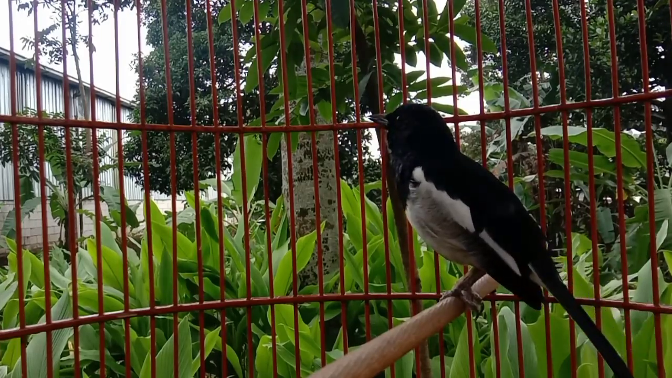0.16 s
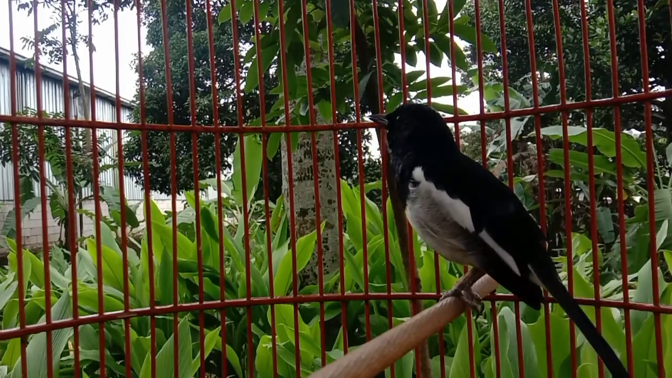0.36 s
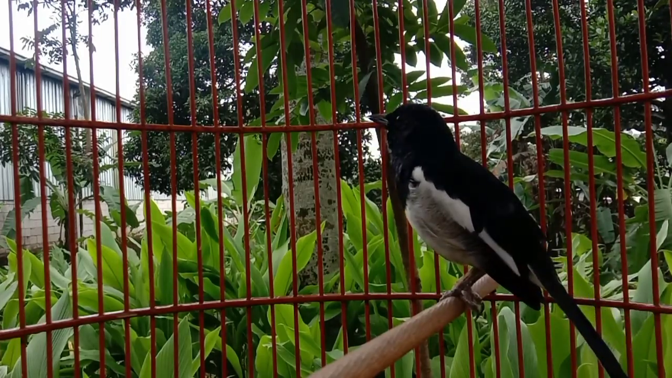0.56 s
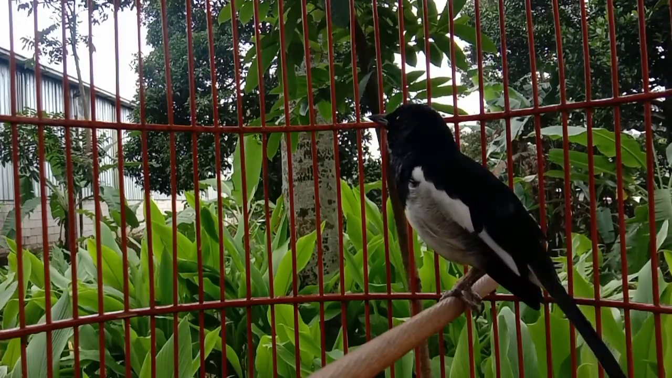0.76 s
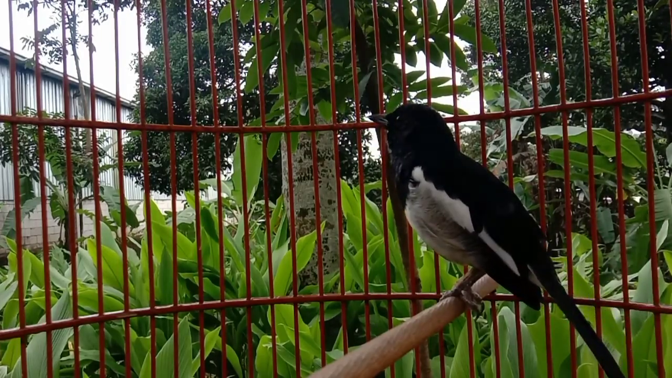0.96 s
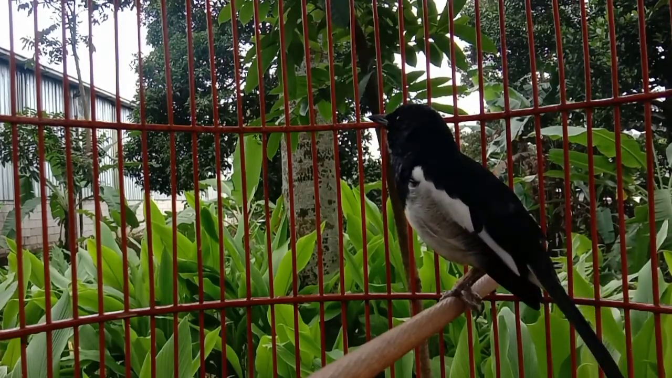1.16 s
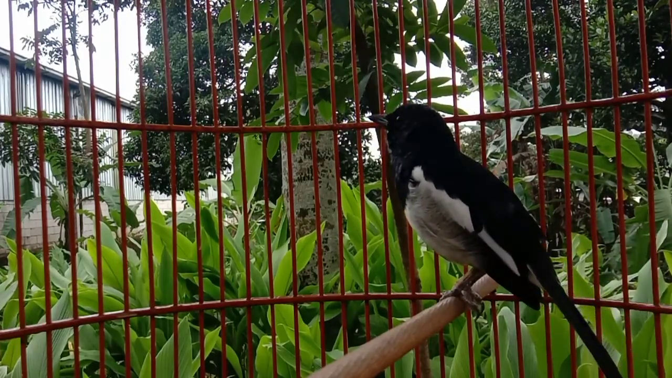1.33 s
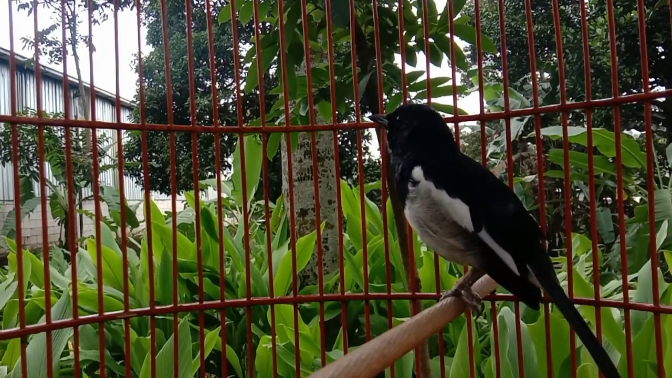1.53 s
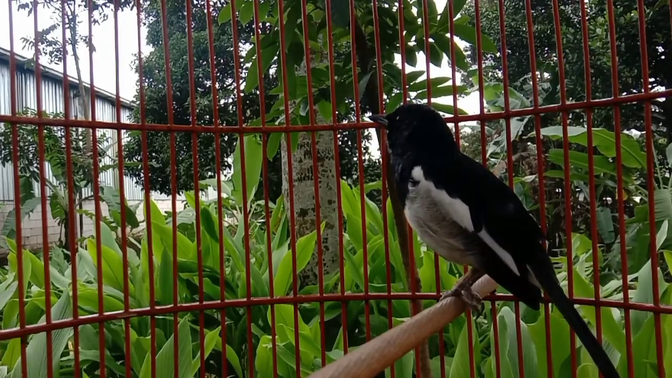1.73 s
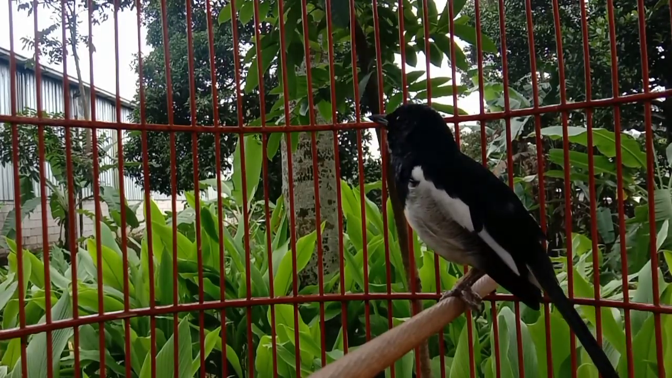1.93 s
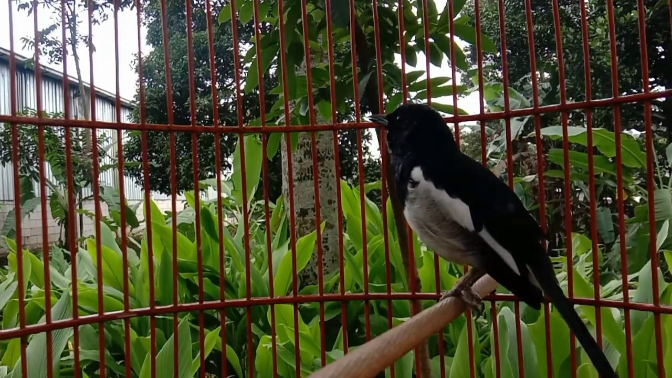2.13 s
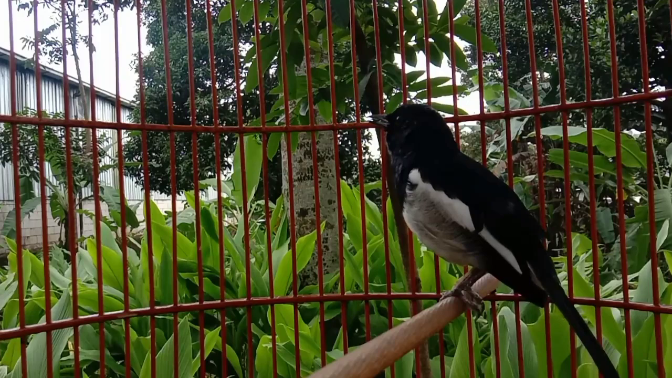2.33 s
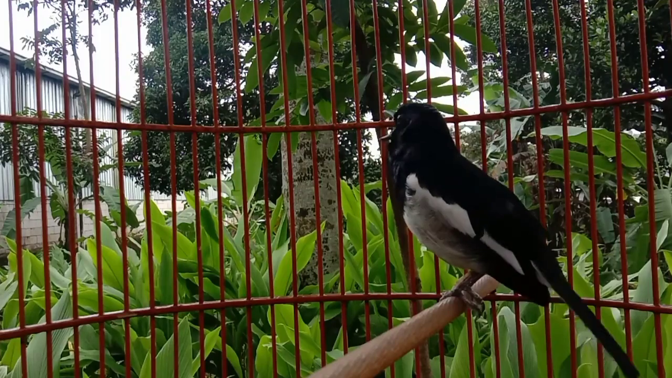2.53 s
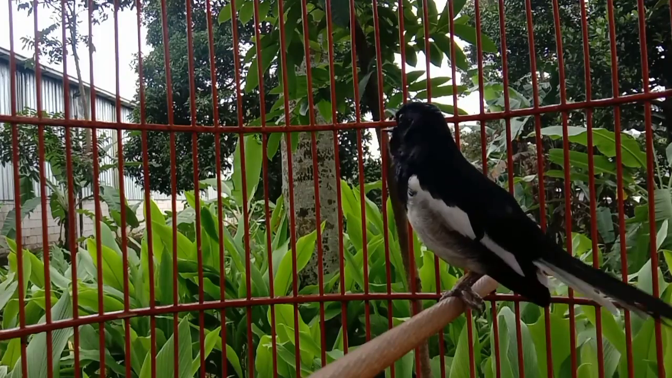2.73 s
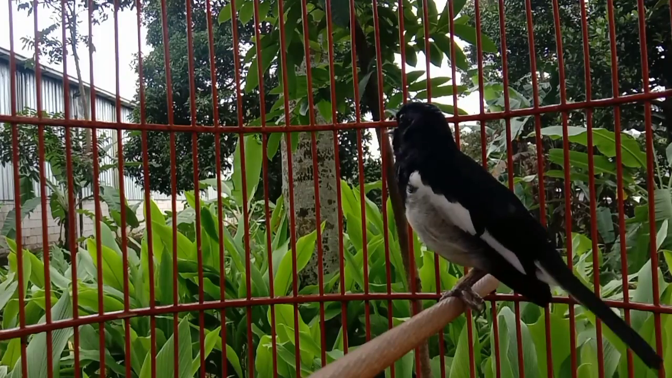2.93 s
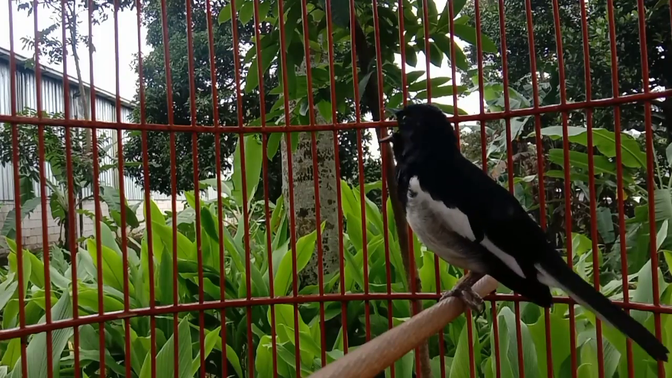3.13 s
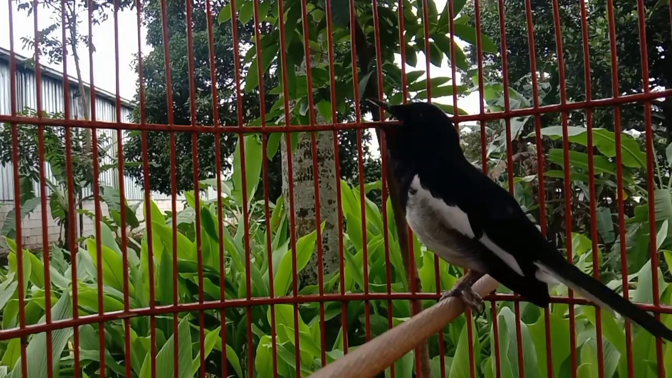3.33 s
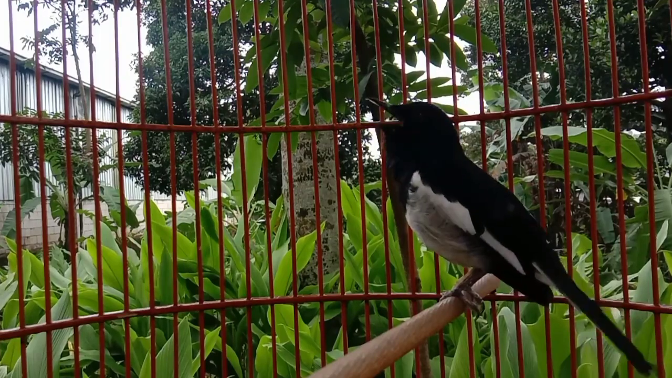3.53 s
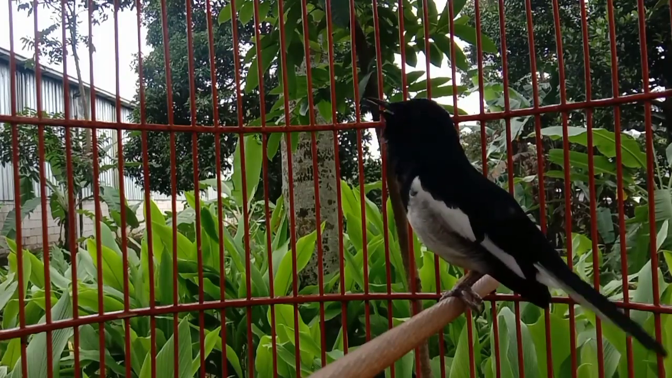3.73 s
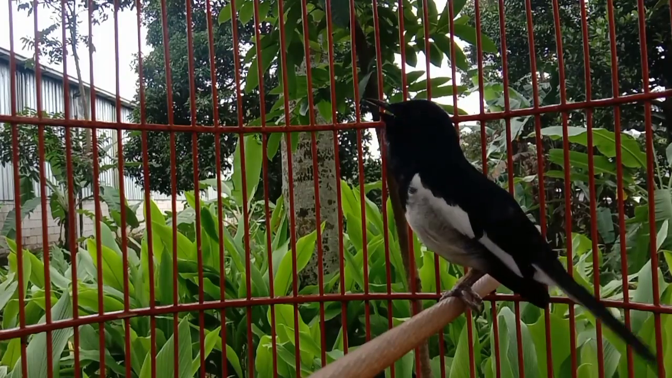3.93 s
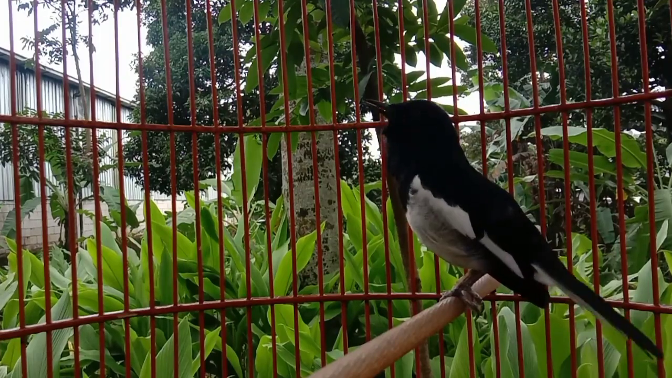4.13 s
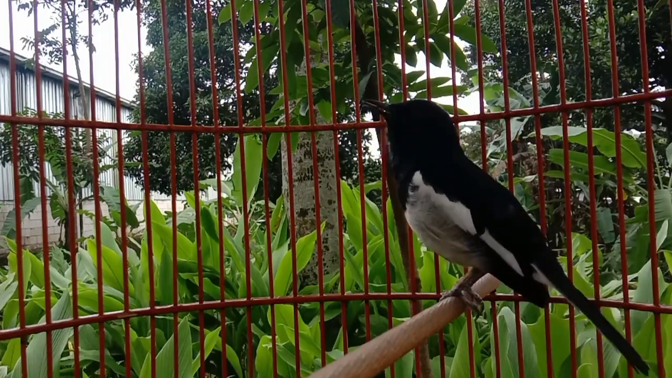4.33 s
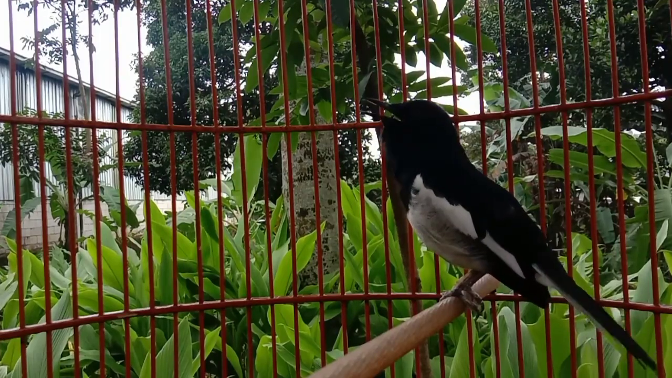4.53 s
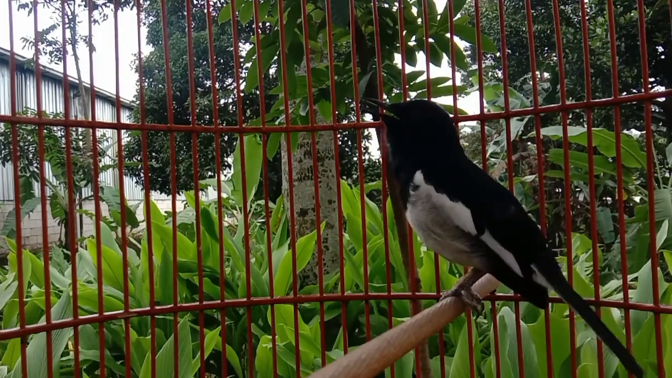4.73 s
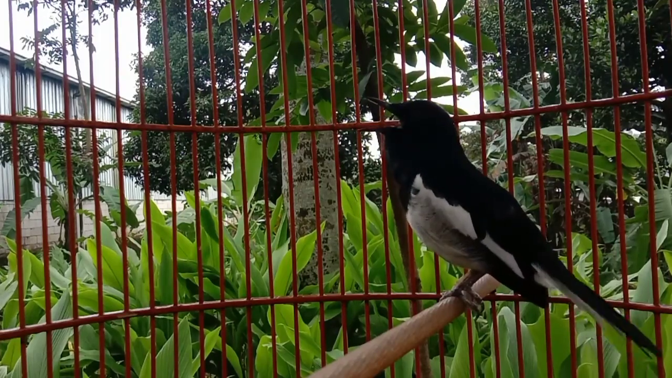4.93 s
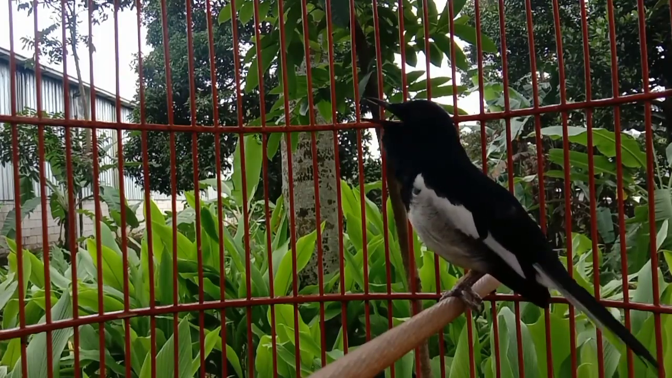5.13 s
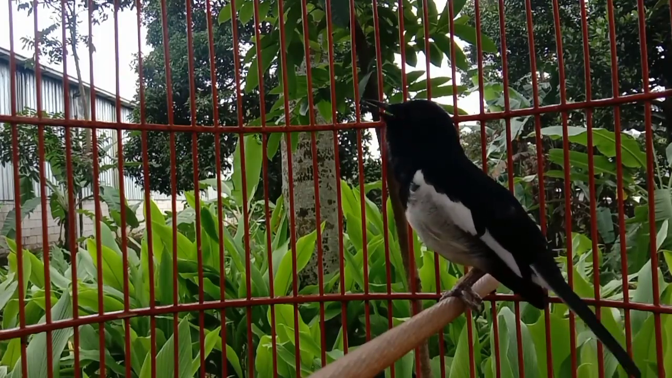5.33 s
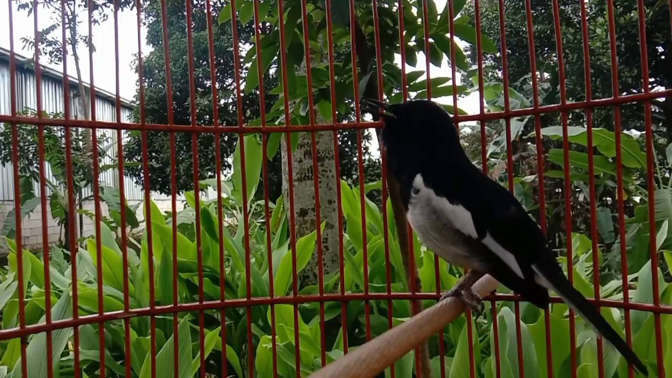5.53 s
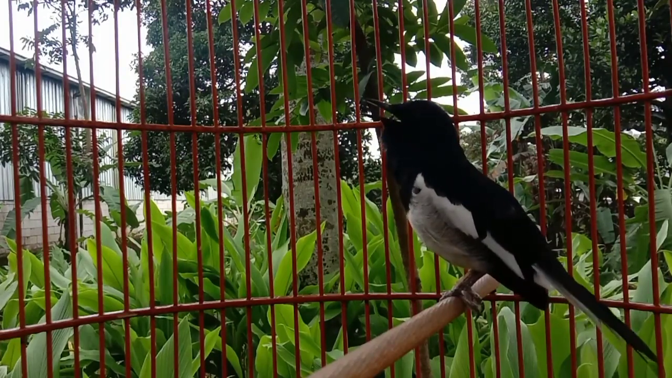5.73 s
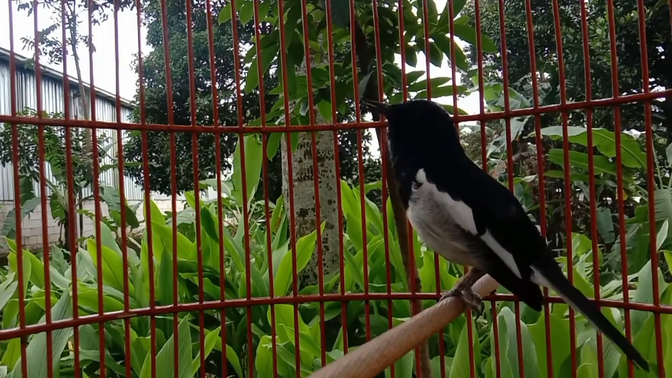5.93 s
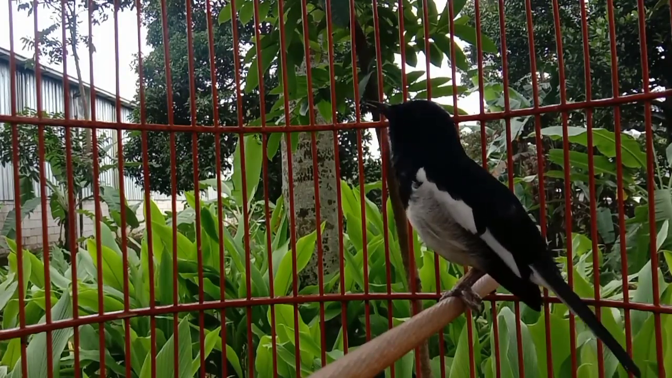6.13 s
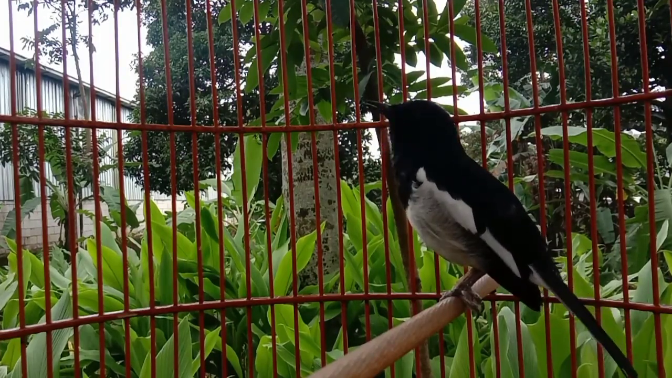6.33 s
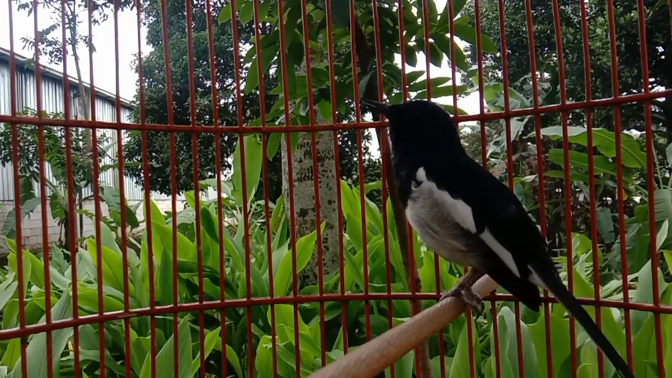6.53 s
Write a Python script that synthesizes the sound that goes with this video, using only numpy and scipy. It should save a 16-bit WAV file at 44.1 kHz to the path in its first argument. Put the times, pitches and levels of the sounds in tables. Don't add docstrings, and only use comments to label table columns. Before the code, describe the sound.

A caged songbird whistles nine loud, clear, varied notes close by, after a quiet garden opening with a far rooster and rustles.

```python
import sys
import numpy as np
from scipy import signal
from scipy.fft import rfft, irfft, next_fast_len
from scipy.io import wavfile
from scipy.ndimage import uniform_filter1d, map_coordinates

SR = 44100
rng = np.random.default_rng(int(sys.argv[2]) if len(sys.argv) > 2 else 0)


def generate_wav(signal):
    frames = np.transpose(np.atleast_2d(signal))
    scaled = np.clip(frames, -1, 1) * 32767
    pcm = np.round(scaled).astype(np.int16)
    wavfile.write(sys.argv[1], SR, pcm)


def volts(x):
    e = np.asarray(x, float) / 20
    return 10 ** e


N = 289296
TIME = np.arange(N) / SR

# time in seconds, level in dB.
TRAFFIC = [(0, -56.5), (.95, -53.5), (1.4, -55.5), (1.9, -55), (2.95, -55), (3.45, -53.5), (4, -59),
           (4.35, -54), (5.4, -58.5), (5.95, -54.5), (6.25, -53), (6.56, -57)]
# frequency in Hz, density in dB per Hz.
RUMBLE = [(15, -45), (25, -14.5), (43, -26), (73, 6), (113, 2.5), (257, -11), (318, -17.5), (441, -30.5),
          (500, -31.5), (650, -46.5), (1100, -120)]
# frequency in Hz, density in dB per Hz.
AIR = [(180, -35.5), (300, 2.5), (1360, -9.5), (1500, -7.5), (1660, -13), (3990, -18.5), (4410, -14.5),
       (7300, -25), (8200, -31), (9940, 2.5), (11500, -35), (13000, -33), (14500, -27), (15800, -28)]
# centre in Hz, width in Hz, level in dB, unsteadiness in dB.
DRONES = [
    (1256, 30, -75, 4.5),
    (4300, 110, -76.5, 3.5),
    (5700, 200, -76.5, 4.5),
    (9910, 440, -65.5, 2),
]
# peak in seconds, level in dB, rise in seconds, t60 in
# seconds.
PUFFS = [
    (0.985, -46, 0.06, 0.5),
    (1.814, -56.5, 0.0044, 0.46),
    (2.461, -54, 0.11, 0.27),
    (6.09, -61, 0.034, 0.32),
    (5.41, -63, .06, .3),
    (3.39, -52, .02, .55),
]
# frequency in Hz, density in dB per Hz.
PUFF_COLOURS = [
    [(120, -39), (372, -0.5), (908, -7.5), (1250, 3.5), (1590, -8.5), (2810, -9), (7600, -18), (8500, -32),
     (15000, -36)],
    [(590, -48), (1000, -18), (1380, -8.5), (2500, -16.5), (7500, -24), (9000, -36), (15000, -42)],
    [(180, -41), (300, -13.5), (700, -2), (1020, -16), (1270, 2), (1800, -31), (2340, -57), (3960, -120)],
    [(1760, -30), (3000, 0), (4810, -9.5), (6930, 5), (8000, -17.5), (10400, -45.5), (17600, -120)],
    [(3000, -30), (4600, -6), (5500, 0), (7400, -6), (8200, -30), (12000, -60)],
    [(1000, -30), (1700, -4), (5000, 0), (7500, -6), (9000, -20), (13000, -40)],
]
# time in seconds, level in dB.
TICKS = [
    (.95, -62),
    (.969, -57),
    (.981, -52),
    (.998, -54),
    (1.006, -56),
    (1.012, -58),
    (1.813, -62),
]
# frequency in Hz, t60 in seconds.
WALLS = [(1000, 0.086), (2200, .55), (3000, 0.64), (4500, .55), (7000, .45), (12000, .3)]
# start in seconds, end in seconds, first Hz, last Hz, level in dB.
NEIGHBOUR = [(1.945, 2.0, 3220, 3250, -56), (2.065, 2.1, 3720, 3650, -52), (2.09, 2.17, 3700, 2950, -52),
             (2.155, 2.235, 2950, 2700, -52), (2.21, 2.34, 2250, 1750, -56),
             (2.425, 2.492, 2800, 2680, -50), (2.645, 2.7, 2550, 2300, -41), (2.69, 2.72, 2330, 1950, -43),
             (5.515, 5.56, 3500, 3530, -39), (5.55, 5.61, 3550, 2980, -38), (5.6, 5.66, 3000, 2880, -38),
             (5.65, 5.72, 2950, 3000, -41), (6.235, 6.275, 2080, 2350, -52), (6.265, 6.31, 2310, 2490, -53),
             (6.3, 6.39, 2460, 2590, -57), (6.458, 6.495, 2150, 2620, -59), (6.485, 6.56, 2620, 2620, -53)]
# start in seconds, end in seconds, first Hz, last Hz, level in dB.
HAZY = [(2.0, 2.062, 3170, 3120, -57), (2.055, 2.072, 3000, 3700, -57), (2.485, 2.51, 2600, 2250, -57),
        (5.91, 5.955, 2950, 2980, -53), (5.945, 5.985, 3050, 3350, -55), (5.98, 6.06, 3120, 2680, -52),
        (6.01, 6.08, 2450, 2050, -55), (6.07, 6.15, 2050, 1830, -56), (6.38, 6.4, 2550, 2250, -62),
        (5.46, 5.5, 4550, 4650, -56), (5.42, 5.53, 3150, 3150, -50), (1.23, 1.46, 2950, 3280, -65),
        (1.38, 1.58, 3230, 3400, -66), (4.2, 4.46, 4420, 4250, -60)]
# start in seconds, end in seconds, first Hz, last Hz, level in dB.
CROWS = [(0, .33, 1510, 1540, -63), (.35, .6, 1680, 1660, -65), (.45, .95, 1570, 1600, -65),
         (1.13, 1.76, 1545, 1520, -56), (1.66, 2.14, 1515, 1475, -63), (.03, .3, 890, 860, -69),
         (.28, .62, 800, 825, -66), (.55, 1.0, 800, 790, -65), (.98, 1.3, 795, 785, -72),
         (.68, .95, 2010, 2020, -75), (.03, .32, 2520, 2500, -70), (.2, .33, 2150, 2170, -70),
         (.55, .76, 3150, 3170, -72), (0, .08, 3150, 3140, -69), (1.05, 1.3, 2400, 2400, -74),
         (1.54, 1.7, 2500, 2480, -75), (.97, 1.0, 1650, 1600, -58)]
# start in seconds, end in seconds, first Hz, last Hz, level in dB.
CHIRPS = [(.66, .72, 3600, 3700, -68), (.69, .76, 3950, 3600, -65), (.76, .96, 3100, 2950, -55),
          (.76, .86, 3450, 3200, -63), (.74, .95, 4400, 4000, -63), (.66, .75, 5880, 5300, -70),
          (.83, .91, 5800, 5950, -69), (1.12, 1.22, 5700, 5500, -72), (1.56, 1.61, 6370, 5900, -75),
          (.945, 1.06, 1270, 1260, -53.5), (1.02, 1.16, 2800, 2600, -63), (.83, .9, 2500, 2600, -64),
          (5.43, 5.52, 3400, 3900, -61), (3.46, 3.55, 5000, 4900, -60)]
# starts in seconds, then levels in dB.
CHATTER_S = [2.098, 2.13, 2.163, 2.195, 2.215, 2.332, 2.366, 2.4, 2.428]
CHATTER_DB = [-61, -57.5, -56.5, -64, -66, -56.5, -56, -59, -65.5]

# time in seconds, pitch in Hz, level in dB.
OPENING = [
    [(2.548, 3128, -19), (2.585, 3187, -15.5), (2.64, 3203, -14.5), (2.665, 3301, -13.5),
     (2.73, 3179, -12.5), (2.79, 2892, -17), (2.82, 2780, -15.5), (2.874, 2750, -17)],
    [(3.018, 3650, -17), (3.055, 3700, -15), (3.068, 3720, -19), (3.088, 3730, -18.5), (3.14, 3480, -10),
     (3.158, 3440, -10)],
    [(3.18, 3300, -21), (3.225, 3260, -18.5), (3.258, 3080, -19), (3.27, 2830, -29), (3.3, 2600, -33),
     (3.342, 2250, -37), (3.353, 2120, -48), (3.363, 2050, -54), (3.37, 1900, -48)],
]
WARBLES = [
    [(3.595, 3070, -16.5), (3.62, 2816, -18.5), (3.645, 2780, -13.5), (3.708, 2556, -16),
     (3.738, 1980, -15), (3.762, 1520, -27), (3.769, 1700, -34)],
    [(3.806, 1838, -33), (3.812, 2323, -19.5), (3.832, 2563, -12), (3.843, 2635, -15.5), (3.85, 2960, -14),
     (3.87, 3180, -15.5), (3.895, 3028, -14), (3.922, 3080, -17.5), (3.947, 2478, -16.5)],
    [(4.067, 2599, -18), (4.09, 2513, -14.5), (4.135, 2218, -17), (4.172, 1818, -20), (4.187, 1631, -21.5),
     (4.2, 1468, -31)],
]
CLOSING = [
    [(4.473, 2680, -18.5), (4.515, 2666, -14.5), (4.55, 2530, -14.5), (4.6, 2372, -18), (4.68, 2233, -21),
     (4.71, 2235, -16.5)],
    [(4.84, 3062, -18), (4.88, 3098, -12), (4.95, 3112, -12.5), (5.0, 3088, -13), (5.027, 3066, -15)],
    [(5.152, 2908, -18.5), (5.2, 2729, -15), (5.265, 2650, -15.5), (5.29, 2466, -15), (5.315, 2143, -21.5),
     (5.346, 2201, -18)],
    [(5.502, 2285, -18), (5.545, 2237, -18.5), (5.6, 2302, -16), (5.67, 2409, -15.5), (5.78, 2484, -18.5),
     (5.82, 2414, -20.5), (5.848, 2114, -13), (5.875, 1676, -22), (5.908, 1098, -39)],
]
# 2nd, 3rd, 4th, 5th, 6th harmonic in dB under the note.
OVERTONES = [
    (-35.5, -54.5, -35, -67, -70),
    (-20, -45.5, -36.5, -51, -58),
    (-15, -42.5, -33, -49.5, -60),
    (-30.5, -42.5, -26, -40.5, -52),
    (-40, -37.5, -33.5, -49, -60),
    (-47.5, -56.5, -43, -43, -58),
    (-40, -60, -39.5, -43, -55.5),
    (-37.5, -66.5, -41, -58.5, -70),
    (-37, -53, -35, -33, -57.5),
    (-36.5, -60, -42, -48.5, -44),
]
# time in seconds, pitch in Hz, level in dB, trill depth in Hz.
UPPER = [(3.161, 3900, -32, 450), (3.171, 3900, -14, 450), (3.179, 3930, -21, 420), (3.2, 3960, -21, 380),
         (3.26, 3980, -20, 320), (3.295, 3920, -18, 60), (3.349, 3760, -21, 30), (3.356, 3550, -17, 20),
         (3.363, 3480, -21, 20), (3.369, 3330, -14, 20), (3.376, 3100, -36, 0)]
TRILL_S = [3.092, 3.164, 3.38]
# times upper pitch, times lower pitch, level in dB.
MIXES = [(1, -1, -28), (-1, 2, -42), (2, -1, -25), (1, 1, -10), (2, 0, -25), (1, 2, -21), (2, 1, -21),
         (3, 0, -25), (2, 2, -28), (3, 1, -34)]
# start in seconds, end in seconds, first Hz, last Hz, level in dB.
UNDERTONES = [
    (3.718, 3.73, 2250, 2550, -20),
    (3.743, 3.756, 2150, 1750, -27.5),
    (3.686, 3.698, 2700, 2900, -27.5),
]
# start in seconds, end in seconds, first Hz, last Hz, level in dB.
SLIP = (4.706, 4.722, 4400, 4000, -47)
# start in seconds, end in seconds, first Hz, last Hz, level in dB.
HELD = (3.1, 3.262, 7480, 7350, -48)
# time in seconds, jump in Hz, level change in dB.
LEAPS = [(3.612, 89.5, 4), (3.657, 227.6, -6.5), (3.67, 430.5, -5), (3.693, 743.5, -4.5),
         (3.719, 1796, -24), (3.7495, 1750, -9), (3.846, 446, -7.5), (3.853, 395.5, -8.5),
         (3.868, 120.4, -1), (3.882, 119.7, 0), (3.898, 119.7, -0.5), (3.918, 120, -1),
         (3.937, 151.5, -12.5), (4.141, 525, -4.5), (4.158, 633.5, 1), (4.18, 568, -0.5), (4.566, 90, 0),
         (4.583, 90.3, 1.5), (4.598, 90, 0)]
# time in seconds, width in ms, level change in dB.
CATCHES = [(2.568, 4, -2), (2.739, 4.4, -6), (2.76, 1.7, -19.5), (2.769, 1.7, -17), (2.781, 2.2, -13),
           (3.062, 2.5, -6), (3.1, 4, 2.5), (3.108, 1.8, -7), (3.121, 1.6, -9), (3.584, 2, -12),
           (3.618, 2, -2), (3.651, 2.5, -2), (3.678, 3, 2), (3.714, 2, -6), (3.721, 2, -6),
           (4.105, 4, -1.5), (4.13, 4, -3), (4.144, 1.8, 3), (4.187, 2, 3), (4.49, 10, 1), (4.09, 12, 1),
           (4.6, 5, 2), (5.318, 4, -4), (3.6, 1.8, -3.5), (3.667, 1.2, -21), (3.687, 2.3, -8),
           (3.699, 1.4, -11), (3.707, 2.8, 5), (3.731, 2, 5.5), (3.741, 3.6, -10.5), (3.755, 1.4, 13),
           (3.835, 1.1, -3.5), (3.862, 2, -9.5), (3.886, 3.1, -1.5), (3.907, 2.3, -12), (3.928, 3.3, -12),
           (4.056, 2.5, -10.5), (4.122, 2, -2), (4.1405, 1.2, -6), (4.151, 3.2, -18), (4.1646, 1.5, -17),
           (4.1775, 1, -10), (4.1818, 0.75, -5.5), (4.702, 2.4, -16.5), (5.331, 3.2, 1), (5.338, 2.9, -10),
           (5.852, 11.2, -21.5)]
# start in seconds, end in seconds, noise share in dB.
RASP = [(3.13, 3.28, -18), (3.25, 3.385, -24), (3.64, 3.7, -27), (3.68, 3.785, -21), (3.83, 3.875, -18),
        (3.86, 3.96, -26), (4.095, 4.21, -25), (2.74, 2.8, -32), (4.55, 4.725, -37), (5.29, 5.36, -37),
        (5.82, 5.92, -32)]
# time in seconds, spread in seconds, change in dB.
VEILS = [(3.155, .02, -9), (3.74, .022, -12), (3.08, .02, 5), (3.657, .004, 8), (3.67, .004, 8),
         (3.694, .005, 10), (3.72, .005, 10), (3.75, .008, -5), (4.71, .008, -9), (3.68, .006, -6),
         (3.82, .018, -13), (3.885, .035, 5), (2.55, .03, -5), (3.015, .012, -8), (3.6, .01, -5),
         (5.2, .04, 4), (5.69, .05, -7), (4.485, .02, -6), (5.325, .015, -4), (4.69, .008, -2),
         (4.141, .005, 7), (4.159, .005, 6), (4.18, .004, 4), (4.192, .008, -6), (3.848, .006, 6),
         (5.87, .02, -3)]
# frequency in Hz, gain in dB.
TRACT = [(600, -32), (1000, -13), (1600, -1), (2500, 4), (3500, 6.5), (5000, 0.5), (7500, -1), (8400, -4.5),
         (9200, 6), (10500, -5), (12800, -19), (13600, -11), (14600, -20), (16000, -20)]
# start in seconds, end in seconds, level in dB.
TURBULENCE = [
    (3.13, 3.27, -40),
    (3.69, 3.78, -46),
    (4.555, 4.68, -63),
    (4.61, 4.725, -62),
    (3.23, 3.385, -44),
]
# frequency in Hz, density in dB per Hz.
TURBULENCE_COLOURS = [
    [(1200, -31), (1800, -15), (3500, 1.5), (5500, -4.5), (8000, -11), (12000, -12.5), (13900, -38),
     (15000, -19)],
    [(1200, -29.5), (2500, 0.5), (5000, -7), (7500, -26), (9300, 2.5), (11000, -14.5), (12800, -8.5),
     (15000, -24)],
    [(1200, -24), (1800, -4), (2800, -6), (3400, 2.5), (4100, -2), (4700, -26), (9000, -22.5), (11000, -39)],
    [(1200, -32.5), (1800, -12), (3500, -2.5), (5000, 1), (8000, -2.5), (12300, -5), (13800, -36),
     (15000, -17)],
]


def along(points, hz):
    f, value = np.transpose(points)
    return np.interp(np.log(hz + 1), np.log(f + 1), value)


def wobble(rate):
    return map_coordinates(rng.standard_normal(int(N * rate / SR) + 4), [TIME * rate])


def coloured(x, gain):
    m = next_fast_len(N)
    return irfft(rfft(x, m) * gain(np.fft.rfftfreq(m, 1 / SR)), m)[:N]


def noise(gain):
    x = coloured(rng.standard_normal(N), gain)
    return x / np.sqrt(np.mean(x ** 2) + 1e-20)


def track(rows):
    s, *cols = np.transpose(rows)
    span = slice(round(s[0] * SR), min(N, round(s[-1] * SR)))
    return span, [np.interp(TIME[span], s, c) for c in cols]


def bump(time, centre, width):
    return np.exp(-.5 * ((time - centre) / width) ** 2)


def whistle(hz, db):
    index = np.arange(len(hz))
    ends = np.clip(np.minimum(index, index[::-1]) / (.003 * SR), 0, 1)
    fade = np.sin(ends * np.pi / 2) ** 2
    return np.sqrt(2) * volts(db) * fade * np.exp(2j * np.pi * np.cumsum(hz) / SR)


def garden():
    rumble_db, = track(TRAFFIC)[1]
    out = volts(rumble_db + 3.2 * wobble(12)) * noise(lambda hz: volts(along(RUMBLE, hz)))
    out += volts(-61.5 + 0.93 * wobble(11.0)) * noise(lambda hz: volts(along(AIR, hz)))
    buzz = 1 + 0.11 * np.sin(2 * np.pi * 130 * TIME) + 0.092 * np.sin(2 * np.pi * 260 * TIME)
    for centre_hz, width_hz, db, unsteady_db in DRONES:
        drone = noise(lambda hz: bump(hz, centre_hz, width_hz))
        out += volts(db + unsteady_db * wobble(4.3)) * buzz * drone
    return out


def rustles():
    out = np.zeros(N)
    for (s, db, rise, t60), colour in zip(PUFFS, PUFF_COLOURS):
        fall_db = np.where(TIME < s, -20 * (s - TIME) / rise, -60 * (TIME - s) / t60)
        out += volts(db + fall_db + 1.43 * wobble(120)) * noise(lambda hz: volts(along(colour, hz)))
    age = TIME[:SR // 20]
    poles = [np.exp(-2 * np.pi * hz / SR) for hz in (250, 1300, 3500)]
    for s, db in TICKS:
        knock = signal.lfilter([1, -1], np.poly(poles), rng.standard_normal(len(age)))
        out[round(s * SR):][:len(age)] += volts(db - 60 * age / .03) * knock
    return out


def echo(x):
    hz, t, z = signal.stft(rng.standard_normal(SR), SR, nperseg=256)
    dying = z * volts(-60 * t / along(WALLS, hz)[:, None])
    tail = signal.istft(dying, SR, nperseg=256)[1]
    return signal.fftconvolve(np.pad(x, (500, 0)), tail / np.linalg.norm(tail))[:N]


def far_birds():
    calls, wet = np.zeros(N), np.zeros(N)
    blur, flutter = wobble(450), wobble(40)
    chips = [(s, s + 0.0099, 4830, 4290, db) for s, db in zip(CHATTER_S, CHATTER_DB)]
    groups = ((10, -19, NEIGHBOUR), (24, -5, CROWS), (130, -7, CHIRPS), (55, -12, HAZY), (40, -3, chips))
    for blur_hz, wet_db, rows in groups:
        for start, end, first_hz, last_hz, db in rows:
            span, (hz, level_db) = track([(start, first_hz, db), (end, last_hz, db - 2)])
            blurred_hz = hz + blur_hz * blur[span] + 9 * flutter[::-1][span]
            call = whistle(blurred_hz, level_db + 2.5 * flutter[span]).real
            call *= signal.windows.tukey(len(hz), .4)
            calls[span] += call
            wet[span] += volts(wet_db) * call
    return calls + echo(wet)


def turbulence():
    out = np.zeros(N)
    for (start, end, db), colour in zip(TURBULENCE, TURBULENCE_COLOURS[:3] + TURBULENCE_COLOURS[2:]):
        gate = np.clip(np.minimum(TIME - start, 2 * (end - TIME)) / .05, 0, 1)
        hiss = noise(lambda hz: volts(along(colour, hz)) * (hz > 900))
        out += gate * volts(db + 2.5 * wobble(90)) * hiss
    return out


def flicks():
    leaps = [(s, hz, .002 + 0.0016 * hz / 1000, db) for s, hz, db in LEAPS]
    catches = [(s, 0, ms / 1000, db) for s, ms, db in CATCHES]
    crests = np.linspace(*TRILL_S[:2], 6)
    strength = bump(crests, 3.14, .03)
    growth = np.minimum(np.arange(6) / 4, 1) ** 2
    breaks = [(s, 850 * g, .003, -14 * k) for s, g, k in zip(crests, growth, strength)]
    flutter = [(4.614 + .019 * k, 105, .004, 3.2) for k in range(5)]
    return leaps + catches + breaks + flutter


def muscles():
    jump, dip_db, notch_db = 6 * wobble(120), .3 * wobble(70), np.zeros(N)
    for s, hz, width, db in flicks():
        near = slice(round((s - .06) * SR), round((s + .06) * SR))
        shape = bump(TIME[near], s, width)
        jump[near] += hz * shape
        dip_db[near] += db * shape
        if abs(hz) < 85:
            notch_db[near] += db * shape
    return jump, dip_db, notch_db


def opened(rows):
    (s, hz, db), (end, last_hz, last_db) = rows[0], rows[-1]
    return [(s - .013, .97 * hz, db - 15.5), *rows, (end + .009, last_hz, last_db - 17.5)]


def singer():
    jump, dip_db, notch_db = muscles()
    rasp = np.zeros(N)
    for start, end, db in RASP:
        rasp += volts(db) * np.clip(np.minimum(TIME - start, 3 * (end - TIME)) / .04, 0, 1)
    grit = wobble(1400) + 1j * wobble(1400)
    shake = 1 + rasp * grit
    smear = np.exp(6j * rasp * wobble(1500))
    patchy_db = 2.2 * wobble(30)
    coarse = TIME[::20]
    veil_db = sum(db * bump(coarse, s, spread) for s, spread, db in VEILS)
    veil_db = np.interp(TIME, coarse, veil_db)

    trill = np.cos(2 * np.pi * (np.interp(TIME, TRILL_S, [0, 5, 21]) + .04 * wobble(45)))
    upper, swing = np.zeros(N, complex), np.zeros(N)
    duet, (hz, db, depth) = track(UPPER)
    upper[duet] = whistle(hz + depth * trill[duet], db)
    swing[duet] = depth * trill[duet]
    pure, added = (upper * shake).real, np.zeros(N)
    fading = np.clip((3.262 - TIME[duet]) / 0.013, 0, 1)
    counter = whistle(hz - 150 - swing[duet], db - 6.5)
    pure[duet] += fading * (counter * shake[duet]).real
    for start, end, first_hz, last_hz, db in UNDERTONES + [SLIP, HELD]:
        span, (hz, db) = track([(start, first_hz, db), (end, last_hz, db)])
        pure[span] += (whistle(hz, db) * shake[span]).real

    for rows, overtones in zip(OPENING + WARBLES + CLOSING, OVERTONES):
        span, (hz, db) = track(opened(rows))
        low_db = db + dip_db[span] + np.minimum(swing[span], 0) / 30
        low = whistle(hz + jump[span] + .55 * swing[span], low_db)
        high = upper[span]
        turn_low, turn_high = np.exp(1j * np.angle(low)), np.exp(1j * np.angle(high))

        slack_db = 42 * np.clip(np.log2(2400 / hz), 0, .7)
        tones = 0
        for k, tone_db in enumerate(overtones):
            tone_db = tone_db + slack_db / (k + 1) + k * patchy_db[span]
            tones = tones + volts(tone_db) * (turn_low * smear[span]) ** (k + 1)
        voiced = low * volts(-notch_db[span] - jump[span] / 200)
        tones = voiced * (abs(voiced) / 0.28) ** 0.096 * tones

        close_db = 12 * np.clip((hz - 2800) / 300, 0, 1)
        mixed = 0
        for a, b, mix_db in MIXES:
            level = volts(mix_db - np.sign(a) * (a + b > 0) * close_db)
            mixed = mixed + level * turn_high ** a * turn_low ** b * smear[span] ** ((a + b) // 2)
        mixed = np.sqrt(abs(low * high)) * mixed

        chiff = volts(-16) * bump(np.arange(len(hz)), 0, .006 * SR)
        pure[span] += (low * (shake[span] + chiff * grit[span])).real
        added[span] += (volts(veil_db[span]) * tones + mixed).real

    pure[duet] /= (1 + (abs(signal.hilbert(pure[duet])) / .36) ** 4) ** .25
    pure = coloured(pure, lambda hz: 1 / (1 + (950 / (hz + 1)) ** 8))
    added = coloured(added, lambda hz: volts(along(TRACT, hz)))
    pulsing = .35
    return pure + added + turbulence() * (1 + trill * pulsing) / (1 + pulsing)


def scene():
    voice = singer()
    song = voice + volts(-18) * np.roll(voice, round(.0066 * SR))
    level = np.sqrt(abs(uniform_filter1d(song ** 2, size=400)))
    over_db = np.clip(20 * np.log10(level + 1e-9) + 27.5, 0, None)
    lag = np.exp(-1 / (0.012 * SR))
    gain = volts(-signal.lfilter([1 - lag], [1, -lag], 1.09 * over_db))
    rest = volts(-29.8) * echo(song / gain) + far_birds() + rustles() + garden()
    return (song + gain * rest)[None]


def roll_off(x):
    return signal.sosfilt(signal.butter(12, 15960, fs=SR, output="sos"), x)


def record(dry):
    mix = coloured(dry[0], lambda hz: hz < 15620)[None]
    return roll_off(mix)


dry = scene()
out = record(dry)
generate_wav(out)
```